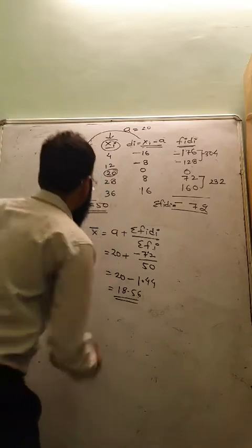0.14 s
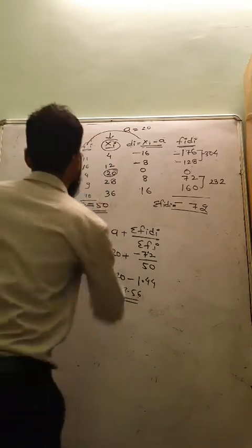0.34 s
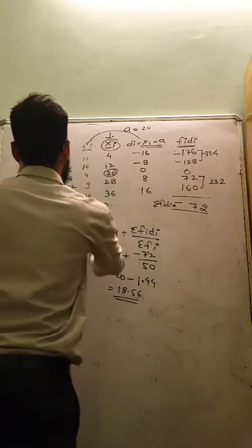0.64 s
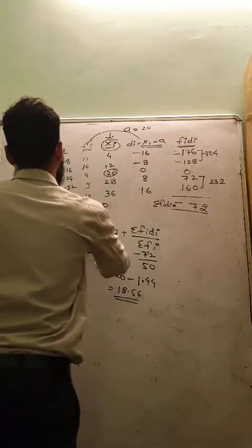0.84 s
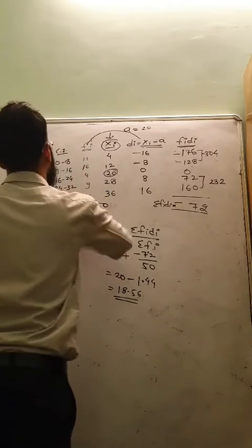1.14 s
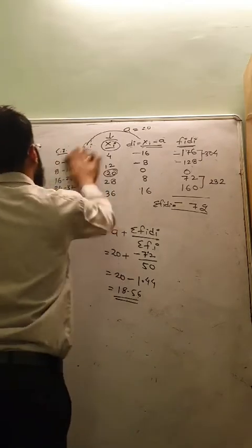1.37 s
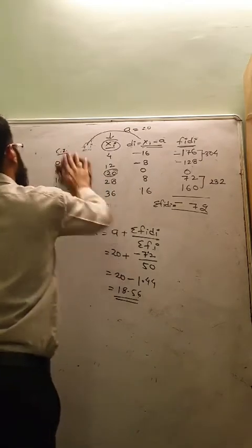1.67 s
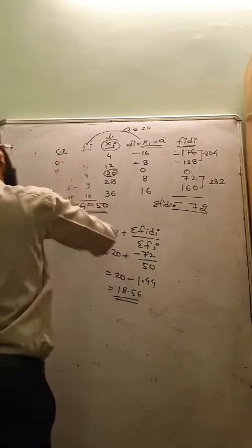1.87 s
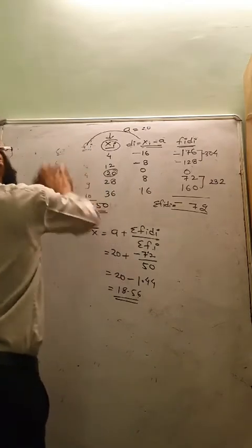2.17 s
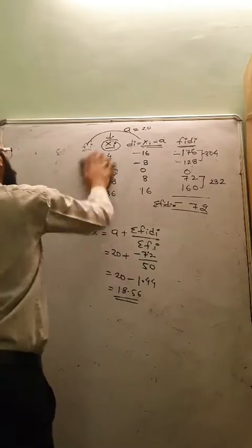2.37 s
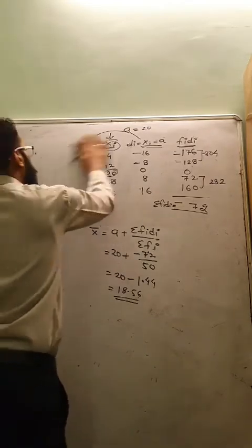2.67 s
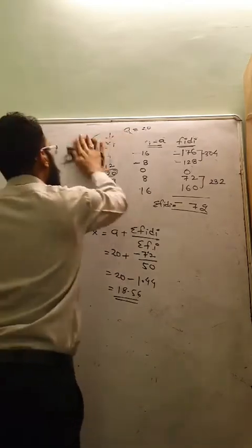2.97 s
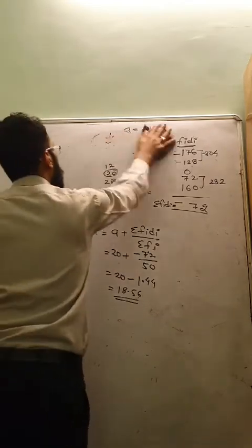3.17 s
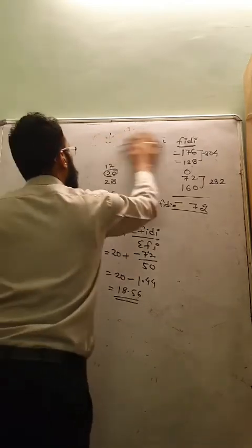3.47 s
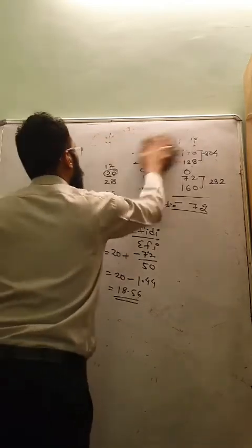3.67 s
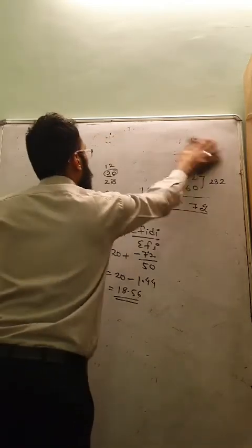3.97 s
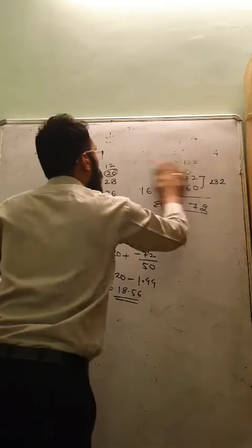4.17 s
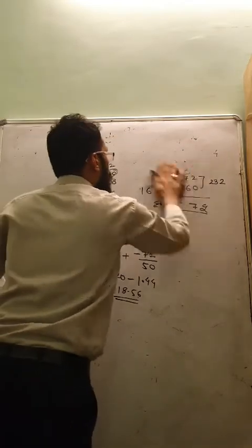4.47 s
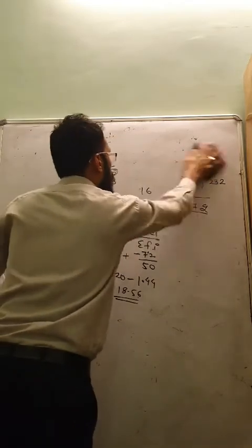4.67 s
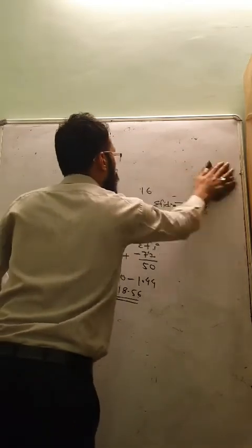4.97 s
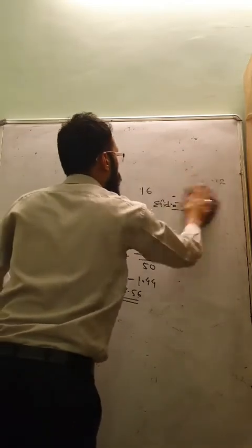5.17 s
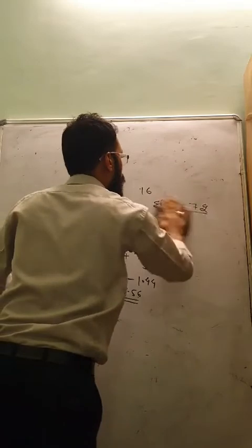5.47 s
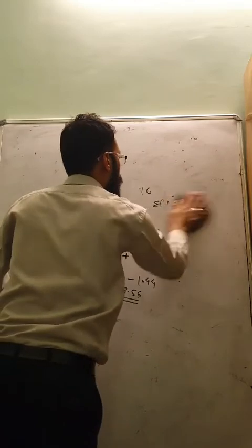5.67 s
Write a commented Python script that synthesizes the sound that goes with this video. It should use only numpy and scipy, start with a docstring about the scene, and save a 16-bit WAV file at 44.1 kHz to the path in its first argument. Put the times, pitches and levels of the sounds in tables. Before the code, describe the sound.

In a small bare room, a sleeve swishes faintly, then a felt duster touches a whiteboard and clacks at about 0.9 seconds. Uneven hissing strokes follow, with a cluster of deep panel thumps near 1.4 seconds and a sharper knock at 1.7. Wiping continues over low rumble, caught by a stereo microphone leaning toward the right in the mids and treble.

```python
"""In a small bare classroom a felt duster is set against a wall-hung whiteboard and rubbed back and forth.
Slipping fibres hiss (filtered grains and noise) and their drag makes the panel rumble (filtered noise). The
duster knocks and judders on the board, ringing the panel's modes, and noise bursts make its frame buzz. The
duster's hard back clacks and its rim scuffs (shaped noise and grains). A sleeve rustles faintly, with two early
swishes, and room hiss lies under it all (filtered noise)."""
import sys
import numpy as np
from scipy import signal
from scipy.fft import rfft, irfft
from scipy.io import wavfile
from scipy.ndimage import uniform_filter1d

SR = 44100
rng = np.random.default_rng(int(sys.argv[2]) if len(sys.argv) > 2 else 0)


def int16_out(signal):
    """Quantize to a 16-bit WAV file."""
    q = np.round(np.clip(np.atleast_2d(signal).T, -1, 1) * 32767)
    wavfile.write(sys.argv[1], SR, q.astype(np.int16))


N = 257544
T = np.arange(N) / SR
FREQS_HZ = np.fft.rfftfreq(N, 1 / SR)

# strokes of the duster, each lasting until the next:
# (start [s], fastest at [s], relative hiss when fastest [dB], relative drag when fastest [dB])
WIPE_STROKES = [(0.971, 1.05, -60.5, -70), (1.131, 1.19, -57.5, -58), (1.38, 1.62, -55.5, -49),
                (1.789, 1.963, -55.5, -46.5), (2.138, 2.285, -56.5, -55.5), (2.62, 2.76, -58.5, -56),
                (3.011, 3.165, -58, -62), (3.232, 3.286, -58, -60.5), (3.409, 3.568, -58, -60),
                (3.62, 3.706, -60, -52.5), (3.79, 3.878, -58.5, -55.5), (4.089, 4.264, -59.5, -54.5),
                (4.417, 4.566, -59, -58), (4.731, 4.956, -57, -54.5), (5.011, 5.24, -55, -46.5),
                (5.46, 5.59, -55.5, -58.5), (5.67, 5.762, -55.5, -54.5)]
# felt pressed on the board before wiping:
# (time [s], relative hiss [dB], relative drag [dB], hiss fade [dB/s])
FELT_TOUCHES = [(0.502, -63, -55.5, 103), (0.862, -59.5, -51.5, 104)]


def undb(db):
    """Decibels to gain."""
    return 10 ** (np.asarray(db) / 20)


def unit(x):
    """Scale to rms 1."""
    return x / np.sqrt(np.mean(x ** 2))


def over_hz(points):
    """Join (Hz, value) points on a log-frequency axis."""
    hz, value = np.transpose(points)
    return np.interp(np.log(FREQS_HZ + 1), np.log(hz), value)


def filtered(x, response):
    """Apply a frequency response as a short filter, with silence beyond both ends."""
    half = 4096
    taps = np.roll(irfft(response, N), half, axis=-1)[..., :2 * half]
    taps = taps * signal.get_window("hann", 2 * half)
    spread = signal.fftconvolve(np.atleast_2d(x), np.atleast_2d(taps), axes=1)
    return spread[:, half:half + N]


def colour(x, points):
    """Shape by a (Hz, dB) spectrum, keeping the power of white noise."""
    return filtered(x, unit(undb(over_hz(points))))


def lowpass(x, hz):
    """Gentle first-order low-pass."""
    return signal.sosfilt(signal.butter(1, hz, fs=SR, output="sos"), x)


def fade_in(full_at_s, length_s):
    """A ramp from silence that is complete at full_at_s."""
    return np.clip((T - full_at_s) / length_s + 1, 0, 1)


def walk(rate_hz):
    """Smooth random wander with a spread of 1."""
    k = int(SR / rate_hz)
    steps = np.repeat(rng.standard_normal(N // k + 1), k)
    return unit(uniform_filter1d(steps, k)[:N])


def diffuse():
    """White noise at two microphone ports: alike in the bass, unrelated in the treble."""
    # likeness of the ports: (frequency [Hz], likeness [0-1])
    port_likeness = [(100, 0.78), (290, 0.88), (640, 0.96), (1000, 0.68), (1500, 0)]
    mid, side = rfft(rng.standard_normal((2, N)))
    like = np.clip(over_hz(port_likeness), -.99, .99)
    mid = mid * np.sqrt((1 + like) / 2)
    side = side * np.sqrt((1 - like) / 2)
    return irfft(np.array([mid + side, mid - side]), N)


def add(track, sound, start_s):
    """Mix a sound into a track."""
    i = int(start_s * SR)
    track[i:i + len(sound)] += sound[:N - i]


def room(x, wet_db):
    """Direct sound plus a dense tail whose treble dies sooner."""
    t60_s, treble_t60_s = 0.41, 0.31
    noise, t = diffuse()[:, :SR], T[:SR]
    low = lowpass(noise, 2500)
    tail = low * 1000 ** (-t / t60_s) + (noise - low) * 1000 ** (-t / treble_t60_s)
    tail *= 1 - np.exp(-t / .003)
    tail /= np.sqrt(np.sum(tail ** 2) / 2)  # unit energy per port
    wet = signal.fftconvolve(np.atleast_2d(x), tail, axes=1)[:, :N]
    return x + undb(wet_db) * wet


def fibres(slips_per_s, spread_db):
    """Countless tiny slips of uneven size."""
    slips = (rng.random(N) < slips_per_s / SR) * rng.standard_normal(N)
    extra_db = spread_db * np.minimum(rng.exponential(size=N), 4)
    return unit(slips * undb(extra_db))


def air():
    """Faint hiss of the room, its level barely wandering."""
    # colour of the room: (frequency [Hz], relative level [dB])
    air_colour = [(18, -32), (30, 11.5), (92, 3.5), (203, -4.5), (390, -4.5), (445, -8.5), (659, -8),
                  (856, -20), (1140, -4), (1410, -14), (1980, 1), (3250, -29), (6430, -16), (15600, -27)]
    return colour(diffuse(), air_colour) * undb(.5 * walk(2.0) - 73)


def sleeve():
    """Shirt cloth slides over itself: a faint rustle that swells when the arm lifts."""
    # swishes: (time [s], level [dB], half length [s])
    swishes = [(0.306, -64, 0.076), (0.559, -65.5, 0.071)]
    # colour of the cloth: (frequency [Hz], relative level [dB])
    cloth_colour = [(500, -11.5), (1300, -6), (2100, 5.5), (3200, -3), (6500, -7.5), (9000, -15.5),
                    (15000, -32)]
    power = undb(-74.5) ** 2  # constant rustle
    for at_s, db, half_s in swishes:
        power = power + undb(db) ** 2 * np.exp(-((T - at_s) / half_s) ** 2)
    return colour(diffuse(), cloth_colour) * np.sqrt(power) * undb(0.34 * walk(46))


def ring(modes):
    """Impulse response of a set of decaying modes."""
    t = T[:SR // 2]
    return sum(undb(db) * np.cos(2 * np.pi * hz * t) * np.exp(-np.log(1000) * t / t60_s)
               for hz, db, t60_s in modes)


def bumps(pushes, buzz_rise_s, buzz_decay_s, buzz_lead_s):
    """A soft push rings the panel, and its loose edge chatters in the frame."""
    # whiteboard modes: (frequency [Hz], relative level [dB], T60 [s])
    panel_modes = [(67.3, -30, 1), (87, -41, 0.037), (124, 5, 0.1), (148.2, 5.5, 0.078),
                   (168.2, -7.5, 0.22), (184, -7, 0.14), (243.8, -13.5, 0.2), (291.5, -2, 0.15),
                   (316, -27, 0.34), (422, -22, 0.46), (409.8, -6.5, 0.2), (459, -72, 0.25),
                   (568, -13.5, 0.43), (674, -3.5, 0.45)]
    # strong wall reflections: (delay [s], gain)
    wall_echoes = [(.034, 0.73), (.042, 0.31), (.068, .25)]
    # colour of the frame: (frequency [Hz], relative level [dB])
    buzz_colour = [(90, -56), (170, 16), (300, 6), (450, 1), (700, 0), (900, -5), (1300, 1), (1700, -2),
                   (2200, -4.5), (3000, -19), (5000, -34), (12000, -34)]
    force, chatter, t = np.zeros(N), np.zeros(N), T[:SR // 2]
    burst = (1 - np.exp(-t / buzz_rise_s)) ** 2 * np.exp(-t / buzz_decay_s)
    for at_s, thud_db, buzz_db, push_ms in pushes:
        width_s = push_ms / 1000
        push = np.sin(np.pi * np.minimum(t / width_s, 1)) ** 2
        add(force, undb(thud_db) * push / push.sum(), at_s - width_s / 2)
        # the edge starts to chatter just before the panel lands
        add(chatter, undb(buzz_db) * burst, at_s - buzz_lead_s)
    # bending waves need a moment to spread across the panel
    panel = -ring(panel_modes) * (1 - np.exp(-t / 0.005))
    direct = signal.fftconvolve(force, panel)[:N]
    thud = direct + sum(gain * np.interp(T - delay_s, T, direct, left=0)
                        for delay_s, gain in wall_echoes)
    rattle = undb(2.46 * walk(300) + 0.55)
    buzz = colour(chatter * diffuse() * rattle, buzz_colour)
    return undb(-10.5) * room(thud, wet_db=-11.5) + undb(7) * room(buzz, wet_db=0.5)


def hand():
    """Relative hiss and drag [dB]: touches die away, then strokes speed up and slow to each turn."""
    last_turn_s, touch_rise_s, settle_db_per_s = 5.81, 0.02, 22
    turn_hiss_loss_db, turn_drag_loss_db, turn_sharpness = 3, 1, 0.87
    starts, fastest, hiss_db, drag_db = np.transpose(WIPE_STROKES)
    moments = np.sort(np.concatenate([starts, fastest, [last_turn_s]]))
    # 1 at the turns, 0 at full speed
    slowing = np.interp(T, moments, 1 - np.arange(len(moments)) % 2) ** turn_sharpness
    wiping = fade_in(starts[0] + touch_rise_s, touch_rise_s)
    hiss = wiping * undb(np.interp(T, fastest, hiss_db) - turn_hiss_loss_db * slowing)
    drag = wiping * undb(np.interp(T, fastest, drag_db) - turn_drag_loss_db * slowing)
    for at_s, touch_db, press_db, fade_db_per_s in FELT_TOUCHES:
        landed = fade_in(at_s, touch_rise_s)
        since_s = np.maximum(T - at_s, 0)
        touch_hiss = landed * undb(touch_db - fade_db_per_s * since_s)
        touch_drag = landed * (1 - wiping) * undb(press_db - settle_db_per_s * since_s)
        hiss = np.hypot(hiss, touch_hiss)
        drag = np.hypot(drag, touch_drag)
    return 20 * np.log10(np.array([hiss, drag]) + 1e-9)


def felt(stroke_db):
    """Fibres slip over the gloss, brighter on fast strokes; dried ink adds a coarser scratch."""
    # colours of felt and of dried ink: (frequency [Hz], relative level [dB])
    felt_colour = [(350, -60), (550, -13), (820, -18), (1170, -6.5), (1420, -12.5), (1610, 1.5), (2080, -1),
                   (3860, -5), (5200, -3.5), (6530, 0), (7900, -3.5), (11800, -1), (15600, -8)]
    ink_colour = [(600, -14), (1400, -12), (2000, 1), (3200, -5), (6000, -5.5), (12000, -39)]
    # slow change of the treble in the hiss: (time [s], added level [dB])
    treble_drift = [(0.55, -6), (1.2, 0), (2.2, -4), (3.1, -5), (4.3, 3.5), (5.0, 0), (5.7, -0.5)]
    hiss_db = stroke_db + 0.4 * walk(35)
    grains = room(fibres(slips_per_s=5600, spread_db=1.0), wet_db=11)
    rub = colour(unit(diffuse() + 0.17 * grains), felt_colour)
    body = lowpass(rub, 6000)
    sheen_db = 0.54 * np.clip(hiss_db + 62, -9, 4) + np.interp(T, *np.transpose(treble_drift))
    hiss = (body + (rub - body) * undb(sheen_db)) * undb(hiss_db + 4.0)
    coarse = room(fibres(slips_per_s=2100, spread_db=8.0), wet_db=16.5)
    ink = colour(unit(coarse), ink_colour)
    scratch_db = 0.68 * hiss_db + 0.18 * walk(5.7) - 23.5
    scratch = ink * fade_in(WIPE_STROKES[0][0], 0.12) * undb(scratch_db)
    return hiss + scratch


def rumble(drag_db):
    """Uneven drag keeps the panel stirring: a deep rumble with a faint hollow murmur above it."""
    # colour of the stirred panel: (frequency [Hz], relative level [dB])
    rumble_colour = [(30, -3), (54, 0), (69, 12.5), (88, -2.5), (120, -6), (195, -3), (255, -20),
                     (295, -16.5), (370, -30), (550, -21.5), (850, -26), (1200, -20), (1700, -47.5),
                     (3000, -74)]
    return colour(diffuse(), rumble_colour) * undb(drag_db + 0.71 * walk(16) - 2.5)


def catches(drag_db):
    """The felt snags at random and nudges the panel, harder when it drags; rows as pushes in bumps()."""
    catches_per_s, spread_db, push_ms = 10, 3.5, 7.8
    thud_over_drag_db, buzz_over_drag_db = 12, -14
    hop = 256
    chance = rng.random((N // hop, 2))
    slots = np.arange(len(chance)) * hop
    snags = chance[:, 0] < catches_per_s * N / SR / len(chance)
    snags &= slots / SR > FELT_TOUCHES[0][0]
    levels_db = drag_db[slots] + spread_db * (2 * chance[:, 1] - 1)
    return [(i / SR, db + thud_over_drag_db, db + buzz_over_drag_db, push_ms)
            for i, db in zip(slots[snags], levels_db[snags])]


def clacks():
    """Hard contacts of the duster's back: noise bursts strongest near 2 kHz, mostly heard via the room."""
    # contacts: (time [s], relative level [dB], decay time [ms])
    contacts = [(0.851, -30, 6.2), (0.866, -26.5, 4.4), (1.148, -59, 13), (1.691, -45.5, 19),
                (1.717, -33.5, 3.8), (2.429, -40.5, 4.7), (5.535, -56, 10.6)]
    # colour of the hard back: (frequency [Hz], relative level [dB])
    back_colour = [(300, -9), (700, -12), (1300, -17.5), (1550, -10), (1850, 2.5), (2200, 0), (2650, -5.5),
                   (3200, -8.5), (4300, -14.5), (6000, -22), (8000, -37), (15000, -54)]
    contact, t = np.zeros(N), T[:SR // 4]
    for start_s, db, decay_ms in contacts:
        burst = (1 - np.exp(-t / .002)) * np.exp(-1000 * t / decay_ms)
        add(contact, undb(db) * burst, start_s)
    return undb(1.5) * room(colour(contact * diffuse(), back_colour), wet_db=4.5)


def bites():
    """The felt grips as each stroke after the first gets going, pushing the panel; rows as in catches()."""
    delay_s, thud_over_drag_db, buzz_over_hiss_db, push_ms = .065, 5, -6, 3.8
    return [(start_s + delay_s, drag_db + thud_over_drag_db, hiss_db + buzz_over_hiss_db, push_ms)
            for start_s, _, hiss_db, drag_db in WIPE_STROKES[1:]]


def scuffs():
    """The duster's rim catches the gloss: a gritty scrape that swells and dies."""
    # scrapes: (start [s], relative level [dB], time to the peak [s])
    scrapes = [(2.197, -43.5, 0.015), (3.272, -53.5, 0.016)]
    # colour of the rim: (frequency [Hz], relative level [dB])
    rim_colour = [(800, -3), (1500, 7), (2000, 5.5), (2700, 10.5), (3400, 6.5), (4700, 0), (6500, -3),
                  (14000, -45)]
    contact, t = np.zeros(N), T[:SR // 4]
    for start_s, db, peak_s in scrapes:
        swell = (t / peak_s * np.exp(1 - t / peak_s)) ** 2
        add(contact, undb(db) * swell, start_s)
    grit = contact * fibres(slips_per_s=3600, spread_db=2.0)
    return undb(-4.5) * room(colour(grit, rim_colour), wet_db=2.5)


def scene():
    """Everything at the two ports."""
    # duster knocks and judder on the board: (time [s], relative thud [dB], relative frame buzz [dB], push
    # length [ms])
    board_knocks = [(0.484, -56.5, -59.5, 1.4), (0.54, -38.5, -67, 4), (0.594, -52.5, -81, 2.5),
                    (0.813, -36.5, -50.5, 2.7), (0.870, -32, -37, 1.5), (1.289, -25, -42.5, 3.4),
                    (1.347, -13, -50, 13.8), (1.41, -10, -54.5, 13.9), (1.482, -13, -54, 12.3),
                    (1.555, -27.5, -40, 3), (1.690, -14, -29, 3.85), (1.714, -24, -41, 2),
                    (1.892, -33, -52, 4.8), (2.047, -24, -43, 2.61), (2.418, -19.5, -36, 3.5),
                    (2.628, -25.5, -58.5, 14), (3.47, -61, -60, 0.96), (3.738, -28, -90, 13.7),
                    (4.965, -26, -40.5, 2.7), (5.139, -41, -52, 3.2), (5.306, -19.5, -40.5, 4.5),
                    (5.326, -23.5, -42.5, 2.8), (5.676, -27, -43, 2.45)]
    hiss_db, drag_db = hand()
    pushes = board_knocks + bites() + catches(drag_db)
    knocks = bumps(pushes, buzz_rise_s=0.013, buzz_decay_s=0.022, buzz_lead_s=0.016) + clacks()
    return felt(hiss_db) + rumble(drag_db) + knocks + scuffs() + sleeve() + air()


def record(dry):
    """The left port hears first and is dull in the mids; deep bass and the top are cut."""
    # port balance: (frequency [Hz], left minus right [dB])
    port_balance = [(60, -1.5), (250, -.5), (400, -.5), (700, -3), (1200, -10), (2200, -12), (3000, -7),
                    (4400, -2), (8000, -1.5), (12000, 0)]
    lag_s = np.array([[0], [.0003]])
    gains = undb(np.array([[.5], [-.5]]) * over_hz(port_balance))
    gains = gains / np.sqrt(np.mean(gains ** 2, axis=0))
    # long waves reach both ports nearly together
    lag = np.exp(-2j * np.pi * FREQS_HZ * lag_s * FREQS_HZ / (FREQS_HZ + 600))
    heard = filtered(dry, lag * gains)
    heard = signal.sosfilt(signal.butter(6, 43, "high", fs=SR, output="sos"), heard)
    return signal.sosfilt(signal.ellip(10, .2, 70, 15750, fs=SR, output="sos"), heard)


dry = scene()
out = record(dry)
int16_out(out)
```